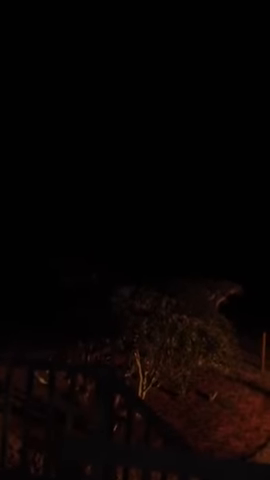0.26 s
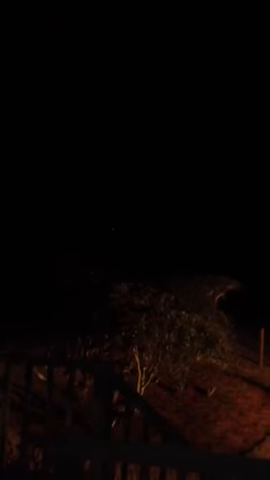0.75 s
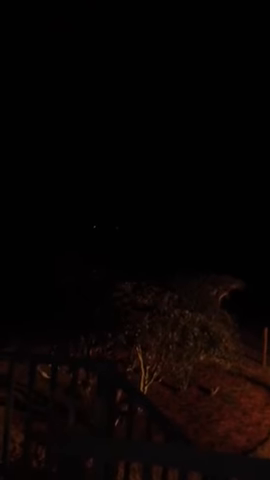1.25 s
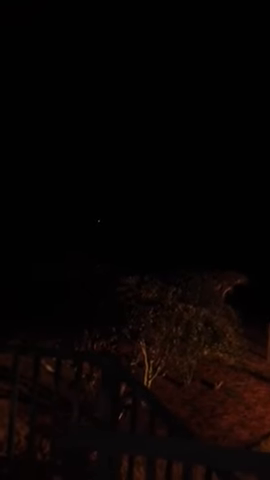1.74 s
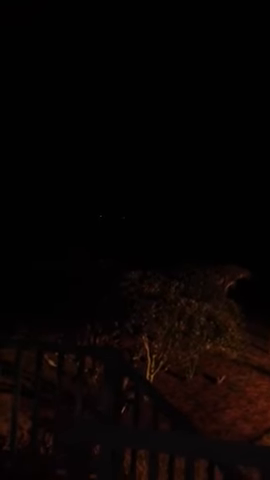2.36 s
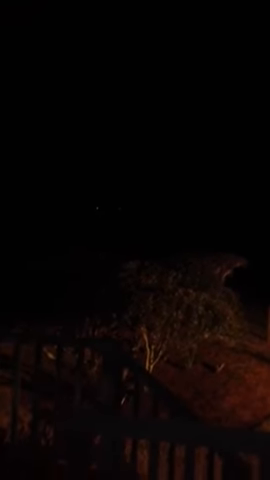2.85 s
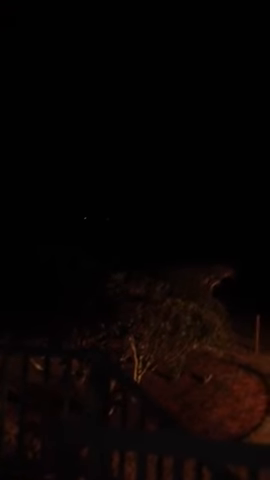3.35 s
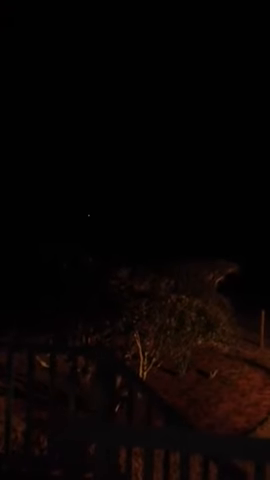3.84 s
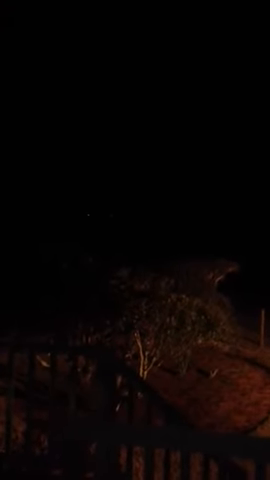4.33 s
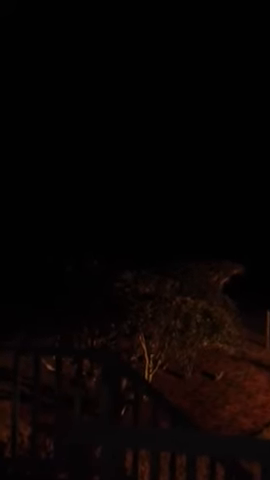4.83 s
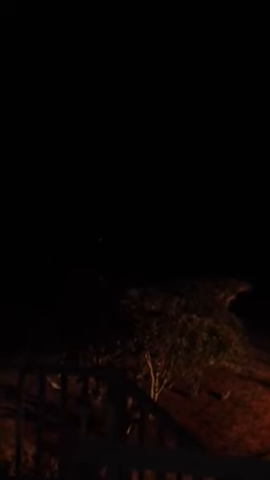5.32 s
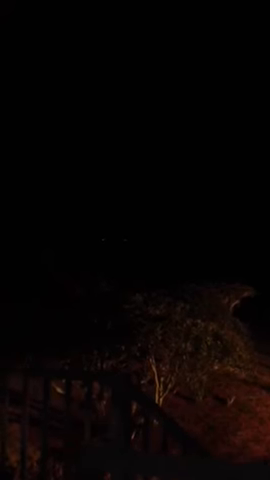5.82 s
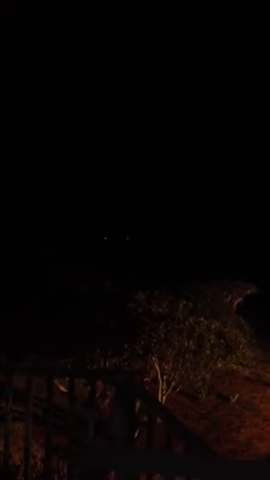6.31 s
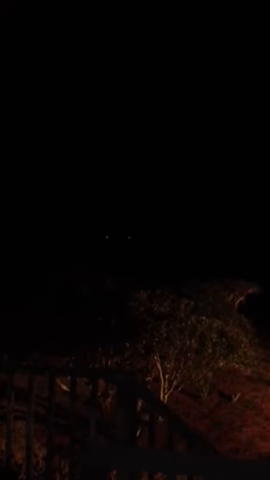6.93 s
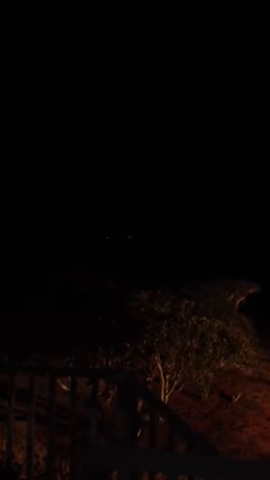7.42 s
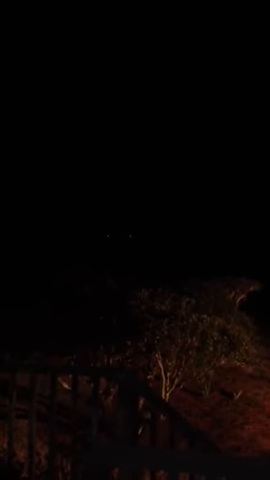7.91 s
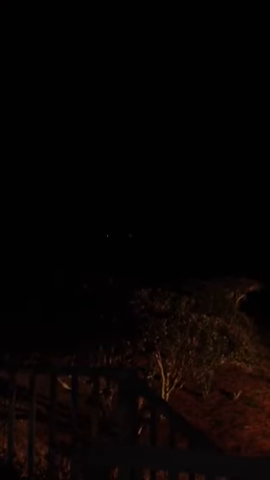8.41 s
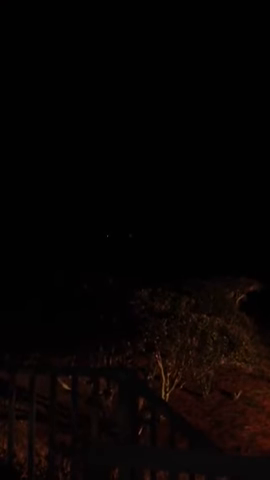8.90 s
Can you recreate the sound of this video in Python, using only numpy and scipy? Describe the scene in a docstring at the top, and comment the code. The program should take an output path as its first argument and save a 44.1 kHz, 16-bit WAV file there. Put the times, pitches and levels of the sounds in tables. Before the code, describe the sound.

Distant coyotes howl and yip together over open brushy ground in the dark. Wavering whistle-like howls come first, then denser, sharper yelps with raspy breaks, and finally scattered short calls. A small tick and a faint thin squeak occur early, close by. The microphone stays still and distant from the animals, picking up low rumble, soft hiss and a weak steady machine hum.

```python
"""Coyote pack at night

A pack yips and howls some way off across open ground; brush scatters the calls and slopes echo them.
Each call is a gliding, nearly pure voice of a few weak partials; where it breaks, it rasps and flutters.
Near the microphone a machine hums as wavering sine lines, with a faint thin squeak and a small tick.
Shaped noise makes the far rumble and the microphone's hiss."""
import sys
import numpy as np
from scipy import signal
from scipy.fft import rfft, irfft
from scipy.io import wavfile
from scipy.ndimage import uniform_filter1d

SR = 44100
rng = np.random.default_rng(int(sys.argv[2]) if len(sys.argv) > 2 else 0)


def unload_audio(sound):
    """Save the sound as a 16-bit wav file, at the path given as the first command line argument."""
    columns = np.transpose(np.atleast_2d(sound))
    # keep every value between -1 and 1, then stretch to whole-number steps
    steps = np.round(np.clip(columns, -1, 1) * 32767)
    wavfile.write(sys.argv[1], SR, steps.astype(np.int16))


N = 403956  # samples


def undb(db):
    """Amplitude factor of a level in dB."""
    return np.exp(np.asarray(db) * (np.log(10) / 20))


def unit(x):
    """Scale to an RMS of 1."""
    return x / np.sqrt(np.mean(x ** 2))


def walk(rate):
    """Random wander: levels held for 1 / rate seconds, smoothed twice, with an RMS of 1."""
    hold = int(SR / rate)
    held = np.repeat(rng.standard_normal(N // hold + 1), hold)[:N]
    return unit(uniform_filter1d(uniform_filter1d(held, hold), hold))


def band(x, hz, width):
    """Band-pass of two pole pairs, centred on hz."""
    edges = [hz - width / 2, hz + width / 2]
    return signal.sosfilt(signal.butter(2, edges, "band", fs=SR, output="sos"), x)


# Long wavering calls: (2nd partial [dB re fundamental], 3rd partial at 1 kHz [dB re fundamental], curve),
# each curve a list of (time [s], pitch [Hz], level of the fundamental [dB])
LONG_CALLS = [(-20, -26, [(0, 1067, -40.5), (.042, 1066, -48), (.125, 950, -41.5), (.16, 927, -53),
              (.185, 868, -46.5), (.277, 878, -42.5)]), (-9, -18, [(.07, 1165, -53), (.085, 1203, -47),
              (.142, 1375, -49), (.157, 1387, -39), (.185, 1396, -54), (.212, 1325, -48),
              (.255, 1100, -62)]), (-21, -25.5, [(.272, 1020, -52), (.29, 1010, -48), (.309, 982, -54),
              (.332, 1027, -38), (.387, 1048, -44), (.404, 1056, -38.5), (.459, 1320, -42.5),
              (.52, 1446, -54), (.579, 1434, -56.5), (.641, 1336, -44.5), (.688, 1305, -61)]),
              (-2, -12, [(.671, 991, -50), (.72, 1133, -49), (.745, 1203, -48), (.765, 1266, -52)]),
              (-17, -30, [(.755, 1290, -54), (.806, 1357, -45), (.855, 1312, -49.5), (.878, 1047, -57),
              (.9, 1000, -67)]), (-1, -25, [(.73, 959, -65), (.79, 701, -61), (.813, 635, -72),
              (.948, 527, -68)]), (-23, -29.5, [(1.18, 476.7, -69), (1.215, 624, -52.5),
              (1.257, 762, -35.5), (1.272, 889, -52), (1.305, 932, -41.5), (1.419, 898, -57.5)]),
              (-18, -35, [(1.449, 910, -49), (1.514, 1046, -40), (1.594, 1168, -56), (1.616, 1250, -37),
              (1.651, 1284, -51), (1.729, 1367, -62)]), (-9, -28, [(1.761, 581, -69), (1.818, 690, -54.5),
              (1.858, 815, -39), (1.876, 840, -53), (1.913, 914, -61), (2.0, 865, -54.5),
              (2.068, 733, -56)]), (-13.5, -35, [(2.285, 697, -56), (2.307, 872, -44), (2.345, 1021, -36),
              (2.355, 1102, -44), (2.362, 1436, -44), (2.385, 1485, -37), (2.469, 1525, -44),
              (2.492, 1467, -41.5), (2.517, 1436, -47.5), (2.547, 1016, -59)]),
              (-17, -31, [(2.548, 1000, -58), (2.556, 999, -47), (2.617, 1244, -57.5), (2.628, 1620, -55),
              (2.645, 1666, -51), (2.686, 1568, -46.5), (2.716, 1390, -69)]),
              (-9.5, -29.5, [(2.772, 589, -67), (2.79, 720, -55.5), (2.803, 853, -43), (2.819, 921, -50.5),
              (2.866, 932, -49.5), (2.886, 1020, -40), (2.908, 1160, -47)]), (-23, -30, [(2.841, 1090, -47),
              (2.893, 1220, -47), (2.902, 1360, -45), (2.956, 1484, -32.5), (3.04, 1475, -33),
              (3.085, 1462, -38), (3.12, 1461, -35), (3.145, 1454, -45), (3.168, 1134, -52)]),
              (-21, -32, [(3.14, 816, -55), (3.163, 880, -41), (3.183, 964, -52), (3.2, 1090, -41),
              (3.258, 1110, -41.5), (3.288, 1117, -76)]), (-13.5, -37, [(3.342, 621, -69),
              (3.362, 850, -43), (3.39, 1030, -35.5), (3.402, 1046, -44)]), (-13, -35, [(3.398, 1443, -45),
              (3.415, 1507, -33.5), (3.48, 1520, -38.5), (3.507, 1542, -37), (3.547, 1570, -43.5),
              (3.59, 1500, -43.5), (3.617, 1116, -53)]), (-18, -31, [(3.43, 715, -55), (3.495, 832, -45.5),
              (3.548, 1039, -36), (3.604, 1022, -39.5), (3.654, 747, -57), (3.754, 653, -51),
              (3.801, 727, -54), (3.829, 743, -43), (3.879, 981, -57), (3.961, 960, -44),
              (4.023, 1150, -40.5), (4.068, 1094, -37.5), (4.128, 758, -60)]),
              (-7.5, -31.5, [(3.729, 934, -51), (3.75, 1076, -47), (3.76, 1396, -47), (3.799, 1488, -34),
              (3.946, 1514, -47), (3.998, 1314, -56)]), (-15, -32.5, [(4.18, 579.5, -54), (4.205, 654, -53),
              (4.22, 663.4, -37.5), (4.232, 722, -36), (4.248, 890, -43.5), (4.272, 951, -41),
              (4.315, 942, -35.5), (4.338, 932, -51), (4.35, 917, -41), (4.407, 928, -60)]),
              (-8.5, -21, [(4.24, 664, -44), (4.288, 623, -55), (4.398, 602.6, -52), (4.437, 729, -45),
              (4.48, 832, -37), (4.552, 710, -46), (4.577, 714, -63), (4.595, 727, -44)]),
              (-11, -34.5, [(4.595, 723, -41.5), (4.654, 945, -43), (4.697, 881, -41), (4.802, 834.6, -53),
              (4.901, 745, -40), (4.999, 649, -58.5), (5.116, 597, -53), (5.163, 690, -44),
              (5.248, 973, -46), (5.308, 1020, -45.5)]), (-25, -20, [(4.52, 1048, -61.5),
              (4.535, 1043, -37), (4.595, 1022, -36), (4.62, 1056, -51), (4.66, 960, -60)]),
              (-15.5, -29.5, [(5.181, 669, -54), (5.37, 707, -52.5), (5.388, 731.5, -36.5),
              (5.408, 746, -40.5)]), (-15, -27, [(5.4, 1080, -66), (5.415, 1022, -37), (5.488, 1024, -39),
              (5.542, 960, -45), (5.565, 934, -58.5), (5.652, 785, -43.5), (5.692, 763.5, -34.5),
              (5.707, 740, -46)]), (-8, -28.5, [(6.61, 617.6, -62), (6.622, 618, -48), (6.75, 625, -49.5),
              (6.782, 685, -50), (6.822, 768, -45.5), (6.857, 806, -52)]), (-25, -25.5, [(6.849, 1036, -48),
              (6.899, 918, -49), (6.949, 979, -52), (7.029, 1019, -31.5), (7.066, 1002, -53)]),
              (-28, -38.5, [(7.009, 600, -42.5), (7.059, 887.3, -42.5), (7.106, 914, -50.5),
              (7.121, 864, -37.5), (7.201, 672.7, -48.5), (7.296, 711, -53.5), (7.418, 631, -58)]),
              (-18, -35, [(8.019, 752, -61), (8.052, 802, -34.5), (8.079, 882.7, -42.5),
              (8.102, 902, -37.5), (8.137, 952, -52)]), (0, -20, [(8.12, 925, -58), (8.15, 935, -52),
              (8.215, 933, -59), (8.25, 736, -65)]), (-17, -30, [(8.58, 916, -61.5), (8.62, 1039, -42),
              (8.655, 1140, -55), (8.713, 1000, -52), (8.748, 940, -60)])]
AIR_HZ = 3400  # the voices carry little above this


def pack():
    """All voices of the pack and the air of their rasps; distance dulls the treble."""
    t = np.arange(N) / SR
    low, high = rasp_curves(t)
    jitter, flutter = walk(130), walk(60)
    out = np.zeros(N)
    for second_db, third_db, rows in LONG_CALLS + yips():
        first = max(int((rows[0][0] - .02) * SR), 0)
        last = min(int((rows[-1][0] + 0.018) * SR), N)
        here = slice(first, last)
        own = (np.arange(first, last) + rng.integers(N)) % N  # each call shakes in its own way
        out[here] += call(t[here], second_db, third_db, rows, low[here], high[here],
                          jitter[own], flutter[own])
    out += breath(low, high)
    return signal.sosfilt(signal.butter(8, AIR_HZ, fs=SR, output="sos"), out)


# Short calls that swell and die: (start [s], loudest [s], end [s], start pitch [Hz], loudest pitch [Hz],
# end pitch [Hz], level of the fundamental at its loudest [dB], 2nd partial [dB re fundamental]);
# an end that comes too early is moved to SHORTEST_S after the loudest point
SHORT_CALLS = [(0, .042, 0.12, 1442, 1636, 1480, -48.5, 8),
               (0.27, 0.289, 0.35, 1598, 1592, 1500, -47.5, 1.5),
               (.04, .08, 0.1, 1560, 1520, 1440, -49, -8), (0.302, .345, 0.35, 1228, 1270, 1250, -60.5, 8),
               (.357, .41, 0.42, 1500, 1620, 1650, -57, 5),
               (5.05, 5.154, 5.25, 1050, 1233, 1346, -59.5, -18),
               (.87, 0.883, .95, 1750, 1720, 1640, -63, 0), (1.04, 1.095, 1.175, 777, 893, 904, -58.5, 1.5),
               (1.166, 1.253, 1.32, 1007, 1024, 1040, -42, -14),
               (1.245, 1.267, 1.3, 1335, 1353, 1360, -47, -6),
               (1.331, 1.399, 1.52, 1984, 1870, 1480, -60.5, -15),
               (1.42, 1.439, 1.47, 895, 842, 723, -43, -21),
               (1.637, 1.684, 1.77, 414, 418.6, 403, -55.5, -18),
               (1.821, 1.878, 1.97, 1218, 1344, 1225, -51.5, -5),
               (1.97, 1.996, 2.07, 1154, 1143, 1170, -45, -20),
               (2.205, 2.24, 2.17, 1000, 1128, 1180, -44.5, -23),
               (2.263, 2.284, 2.22, 1170, 1222, 1245, -47.5, -15.5),
               (3.164, 3.199, 3.09, 1520, 1649, 1660, -42.5, -22),
               (4.248, 4.258, 4.37, 1330, 1340, 1385, -44.5, -27),
               (4.4, 4.426, 4.42, 1083, 1057, 1070, -40.5, -25),
               (4.445, 4.48, 4.2, 1480, 1556, 1605, -41, -14),
               (4.633, 4.655, 4.67, 1470, 1480, 1490, -44, -17),
               (4.879, 4.936, 4.98, 1250, 1601, 1470, -38, -5.5),
               (4.855, 4.886, 4.91, 950, 1045, 1090, -54, -6),
               (4.909, 4.936, 4.92, 769, 806, 792, -42.5, 1.5),
               (4.965, 4.978, 5.03, 1020, 990, 730, -40.5, -21),
               (5.29, 5.384, 5.42, 1150, 1245, 1260, -45.5, -17),
               (5.385, 5.456, 5.47, 1550, 1527, 1500, -48, -12),
               (5.616, 5.656, 5.73, 800, 1000, 1020, -51, -2),
               (5.655, 5.689, 5.78, 1442, 1530, 1410, -40.5, -2.5),
               (5.73, 5.791, 5.75, 1500, 1586, 1560, -49.5, -3),
               (5.7, 5.795, 5.85, 986, 1076, 1060, -40, -15),
               (5.82, 5.864, 5.81, 1060, 1030, 1013, -33, -16),
               (5.9, 5.941, 6.04, 1420, 1495, 1520, -45, -5),
               (5.959, 5.998, 6.1, 1530, 1555, 1345, -40.5, -9),
               (6.084, 6.11, 6.12, 696, 819, 890, -40, -19),
               (6.147, 6.161, 6.18, 1790, 1764, 1720, -36.5, 1),
               (6.178, 6.187, 6.19, 982, 990, 854, -39.5, -16.5),
               (6.175, 6.19, 6.2, 1400, 1399, 1338, -49.5, -11),
               (6.243, 6.284, 6.2, 1360, 1417, 1460, -47, -13),
               (6.314, 6.324, 6.45, 1428, 1423, 1390, -45.5, -6),
               (6.375, 6.41, 6.44, 640, 792, 856, -39.5, -24),
               (6.43, 6.46, 6.54, 1330, 1348, 1340, -46, -10),
               (6.4, 6.45, 6.5, 1200, 1553, 1425, -40, -5.5), (6.475, 6.51, 6.52, 1010, 816, 675, -41, -29),
               (6.547, 6.606, 6.68, 1295, 1349, 1422, -45, -13.5),
               (6.55, 6.599, 6.62, 1130, 1130, 1158, -59.5, -15),
               (6.623, 6.66, 6.7, 1410, 1402, 1410, -47, -14),
               (6.692, 6.714, 6.73, 1000, 867, 810, -52, -20),
               (6.774, 6.831, 6.86, 1320, 1470, 1530, -43, -20),
               (7.027, 7.067, 7.1, 1303, 1360, 1350, -43.5, -25),
               (7.202, 7.228, 7.18, 690, 840, 900, -40.5, -28),
               (7.232, 7.249, 7.24, 1538, 1546, 1460, -43.5, 5.5),
               (7.262, 7.282, 7.34, 1480, 1528, 1490, -44.5, 6.5),
               (7.285, 7.304, 7.39, 1070, 1024, 950, -39, -34),
               (7.61, 7.73, 7.78, 1327, 1513, 1490, -50, -1.5), (7.63, 7.694, 7.9, 723, 731, 746, -60, -9),
               (7.77, 7.858, 7.915, 839, 873, 956, -43.5, -20),
               (7.891, 7.923, 7.97, 1580, 1650, 1490, -59, 17),
               (7.808, 7.845, 7.93, 640, 788.4, 1042, -43, -16),
               (7.832, 7.874, 7.8, 1373, 1438, 1509, -47.5, -29),
               (7.927, 7.955, 7.985, 1055, 1013, 1008, -49.5, -11),
               (7.94, 7.965, 8.01, 1670, 1500, 1286, -55, 1),
               (8.001, 8.037, 8.055, 1280, 1456, 1480, -54, -4),
               (8.03, 8.059, 8.15, 1510, 1633, 1627, -58.5, 18.5),
               (8.241, 8.27, 8.3, 690, 788, 819, -40.5, -24),
               (8.285, 8.327, 8.345, 825, 878, 885, -38, -21),
               (8.25, 8.335, 8.5, 1499, 1480, 1380, -55, -5), (8.3, 8.361, 8.36, 950, 1049, 1040, -45, -23),
               (8.32, 8.406, 8.4, 1035, 1045, 1000, -39, -19),
               (8.7, 8.728, 8.82, 1196, 1236, 1260, -44.5, -21),
               (8.755, 8.781, 8.83, 885, 863, 780, -58, -13.5),
               (8.93, 8.976, 8.9, 850, 922, 959.7, -63.5, 0),
               (9.082, 9.143, 9.3, 1037, 1048, 1051, -56, -18.5)]
ONSET_DB, FADE_DB, SWELL_CURVE = -15.5, -16, 2  # ends re loudest point, and the bend between
GLIDE_CURVE = 1.392  # above 1 the glide slows near the loudest point
THIRD_DB = -13  # 3rd partial at 1 kHz re the 2nd
SHORTEST_S = .018  # quickest dying away


def yips():
    """The short calls, laid out like the long ones."""
    return [yip(*row) for row in SHORT_CALLS]


def yip(start_s, top_s, end_s, start_hz, top_hz, end_hz, db, second_db):
    """A short call glides and swells to its loudest point, then glides on and fades."""
    end_s = max(end_s, top_s + SHORTEST_S)
    away = np.arange(8, -1, -1) / 8  # 0 at the loudest point, 1 at the ends
    rise = [top_s - (top_s - start_s) * away,
            top_hz + (start_hz - top_hz) * away ** GLIDE_CURVE,
            db + ONSET_DB * away ** SWELL_CURVE]
    away = away[-2::-1]
    fall = [top_s + (end_s - top_s) * away,
            top_hz + (end_hz - top_hz) * away ** GLIDE_CURVE,
            db + FADE_DB * away ** SWELL_CURVE]
    return second_db, second_db + THIRD_DB, np.hstack([rise, fall]).T


JITTER, HOARSE_JITTER = .005, .036  # pitch spread as a share: clear, and added when fully hoarse
FLUTTER_DB, HOARSE_FLUTTER_DB = 2.2, 2  # before the weight of each partial: clear, and added when hoarse
FLUTTER_BASE, FLUTTER_RISE = .5, .8  # weight on the fundamental, and added for each higher partial
HEAD_HZ, HEAD_DB = 1337, -22.5  # the voice thins above this pitch: change of the 2nd partial
HEAD_HALF_DB = -13.5  # partial at 1.5 times the pitch, re fundamental, when a high voice turns hoarse
THIRD_DB_PER_OCTAVE = -19.5  # fall of the 3rd partial with pitch
FOURTH_TOP_HZ = 2930  # the 4th partial fades above this
OVERTONE_HOLD = 0.16  # share of the fundamental's dips that the overtones do not follow
SCOOP_DB, SCOOP_S = 18.5, 0.025  # overtone boost of a fast upward scoop, and its decay time
SCOOP_OCTAVES_PER_S = 14.6  # climb that earns the full boost
WHOLE_DB, HALF_DB = -5.5, -4  # a rasp's whole and half partials


def call(t, second_db, third_db, rows, low, high, jitter, flutter):
    """One voice: partials of a gliding pitch; in a rasp it jitters, brightens and doubles its period."""
    s, hz, db = np.transpose(rows)
    level_db = np.interp(t, s, db)
    glide = np.interp(t, s, hz)
    size = undb(level_db)
    fade = np.clip(np.minimum(t - s[0], s[-1] - t) / 0.0025 + 1, 0, 1)
    hoarse = low / (low + undb(-54.5))  # 0 clear, towards 1 in a strong rasp
    pitch = uniform_filter1d(glide, size=SR // 140)
    pitch = pitch * (1 + (JITTER + HOARSE_JITTER * hoarse) * jitter)
    phase = 2 * np.pi * np.cumsum(pitch) / SR

    # overtones hold up in the dips and start rich in a fast scoop
    overtone_db = OVERTONE_HOLD * (db.max() - level_db)
    octaves = np.log2(uniform_filter1d(glide, size=SR // 100))
    climb = np.gradient(octaves) * SR / SCOOP_OCTAVES_PER_S
    overtone_db = overtone_db + SCOOP_DB * np.clip(climb, 0, 1) * np.exp(-np.maximum(t - s[0], 0) / SCOOP_S)
    head = 1 / (1 + (HEAD_HZ / pitch) ** 12)  # 0 in the chest register, 1 in the head register
    second_db = second_db + overtone_db + HEAD_DB * head
    third_db = third_db + overtone_db + THIRD_DB_PER_OCTAVE * np.log2(pitch / 1000)
    fourth_db = third_db - 11.5 - 14 / (1 + (FOURTH_TOP_HZ / (4 * pitch)) ** 12)

    # the folds close unevenly, which shakes each partial, the upper ones most
    shake_db = FLUTTER_DB + HOARSE_FLUTTER_DB * hoarse
    tone = 0
    for k, partial_db in enumerate([0, second_db, third_db, fourth_db]):
        weight = FLUTTER_BASE + FLUTTER_RISE * k
        shaken_db = partial_db + shake_db * weight * np.roll(flutter, 300 * k)
        tone = tone + undb(shaken_db) * np.sin((k + 1) * phase)
    half_gain = undb(HEAD_HALF_DB + 4.9 * np.roll(jitter, 700))
    tone = tone + head * hoarse * half_gain * np.sin(3 * phase / 2)

    # only the chest register breaks; strong and weak cycles alternate and fill in the half partials
    rasp = 0
    if pitch.min() < HEAD_HZ and low.any():
        for k in range(3, 11):  # counted in half partials
            partial_db = HALF_DB if k % 2 else WHOLE_DB
            gain = throat_gain(k / 2 * pitch, low, high) * undb(partial_db + 5.0 * np.roll(jitter, 400 * k))
            rasp = rasp + gain * np.sin(k / 2 * phase)
    breaks = size / (size + undb(-39.5)) / (1 + (pitch / 1250) ** 8)
    return np.sqrt(2) * fade * (size * tone + breaks * rasp)


# Hoarse breaks in the voices: (centre [s], width at half height [s], strength [dB], treble tilt [dB])
HOARSE_BREAKS = [(0.03, 0.12, -53, -8), (0.309, 0.07, -56, -9), (0.433, 0.12, -61, 1),
                 (0.726, .06, -63, -2), (1.262, 0.043, -55.5, -6.5), (2.333, 0.073, -58, -8),
                 (2.807, 0.03, -58, -4), (3.184, 0.036, -58.5, -10), (3.393, 0.029, -46.5, -3),
                 (3.62, 0.032, -60, -16), (4.065, 0.16, -59, -5), (4.27, 0.066, -56.5, -14),
                 (4.469, 0.08, -51, -11.5), (4.521, 0.02, -57, -7), (4.66, 0.06, -55, -14),
                 (4.973, 0.16, -61.5, -2), (5.454, 0.16, -60, -3.5), (5.645, 0.027, -52, -15),
                 (5.746, 0.072, -51.5, -7), (6.135, 0.08, -51.5, -8.5), (6.416, 0.043, -57, -22),
                 (6.479, 0.069, -54, -5.5), (6.858, 0.097, -52.5, -3.5), (7.084, 0.057, -56, -6),
                 (7.283, 0.1, -54.5, -15), (7.571, 0.13, -61.5, -12), (7.901, 0.076, -55, -6.5),
                 (8.1, 0.15, -58.5, -6), (8.349, 0.12, -54.5, -4), (8.66, .12, -64, -10)]


def rasp_curves(t):
    """Bell-shaped strength of the hoarse breaks, for the low and the high throat resonances."""
    low, high = np.zeros(N), np.zeros(N)
    for s, length, db, tilt_db in HOARSE_BREAKS:
        near = slice(max(int((s - 2 * length) * SR), 0), int((s + 2 * length) * SR))
        shape = np.exp(-.5 * ((t[near] - s) / (0.43 * length)) ** 2)
        low[near] += undb(db) * shape
        high[near] += undb(db + tilt_db) * shape
    return low, high


# Throat resonances: (centre [Hz], width [Hz], gain [dB]); the last two follow the treble tilt
THROAT_RESONANCES = [(912, 195, 7.5), (1500, 470, 10.5), (2185, 700, 11), (3340, 470, -2.5)]
BREATH_DB = -10.5  # turbulent air, before each resonance's gain


def throat_gain(hz, low, high):
    """Gain of the throat resonances at a moving frequency, scaled by the strength of the rasp."""
    gain = 0
    for k, (centre, width, db) in enumerate(THROAT_RESONANCES):
        strength = low if k < 2 else high
        gain = gain + undb(db) * strength / np.hypot(1, np.square(2 * (hz - centre) / width))
    return gain


def breath(low, high):
    """Turbulent air of the rasps: noise escapes in uneven puffs and rings the throat resonances."""
    out = np.zeros(N)
    for k, (hz, width, db) in enumerate(THROAT_RESONANCES):
        strength = low if k < 2 else high
        puffs = undb(4.3 * walk(140)) * rng.standard_normal(N)
        out += undb(db + BREATH_DB) * strength * unit(band(puffs, hz, width))
    return out


# Near scatter, then far slopes: (start after the direct sound [s], 60 dB decay time [s], level [dB])
ECHO_TAILS = [(.003, .14, -6.5), (.04, .7, -15.5)]


def echoes(x):
    """Ground and brush scatter the sound at once, which smears fast glides; slopes return it later."""
    t = np.arange(SR) / SR
    response = 0
    for start_s, t60_s, db in ECHO_TAILS:
        tail = rng.standard_normal(SR) * np.exp(-np.log(1000) * t / t60_s) * (t > start_s)
        response = response + undb(db) * tail / np.sqrt(np.sum(tail ** 2))
    return signal.fftconvolve(x, response)[:N]


# Lines of the faint thin squeak: (frequency [Hz], level [dB])
SQUEAK_LINES = [(2300, -73), (4290, -77.5), (6422, -83)]
# When it sounds: (start [s], end [s])
SQUEAK_SPAN = (0.926, 1.22)


def squeak():
    """A faint squeak of steady sine lines that swells in and out."""
    t = np.arange(N) / SR
    start_s, end_s = SQUEAK_SPAN
    swell = np.clip(np.minimum(t - start_s, end_s - t) / .06, 0, 1)
    return swell * sum(np.sqrt(2) * undb(db) * np.sin(2 * np.pi * hz * t) for hz, db in SQUEAK_LINES)


TICK_S, TICK_DB = 0.379, -53  # onset; level of the noise at its onset, before the band-pass


def tick():
    """A small tick near the microphone: a decaying burst of band-passed noise."""
    t = np.arange(N) / SR
    burst = rng.standard_normal(N) * np.exp(-np.abs(t - TICK_S) / 0.013) * (t > TICK_S)
    return undb(TICK_DB) * band(burst, 4700, 4500)


# Lines of the machine near the microphone: (frequency [Hz], level [dB])
HUM_LINES = [(98, -75), (119, -79.5), (170, -73.5), (295, -63)]


def machine_hum():
    """Sine lines that waver slightly in pitch and level."""
    out = np.zeros(N)
    for hz, db in HUM_LINES:
        phase = 2 * np.pi * np.cumsum(hz + 0.893 * walk(6)) / SR
        out += np.sqrt(2) * undb(db + 0.36 * walk(4.5)) * np.sin(phase)
    return out


# Spectrum of the far rumble and the microphone's hiss, and its overall level:
# (frequency [Hz], relative density [dB per Hz])
NIGHT_SPECTRUM = [(15, -58), (25, -15.5), (81, -8), (238, -7), (295, -5), (417, -11), (884, -14),
                  (1400, -15.5), (2960, -28), (15200, -32.5)]
NIGHT_DB = -59


def night():
    """Steady rumble and hiss: white noise shaped along the spectrum."""
    hz, db = np.transpose(NIGHT_SPECTRUM)
    f = np.maximum(np.arange(N // 2 + 1) * SR / N, 1)
    gain = undb(np.interp(np.log(f), np.log(hz), db))
    noise = irfft(rfft(rng.standard_normal(N)) * gain, N)
    return undb(NIGHT_DB) * unit(noise)


def scene():
    """The pack with its echoes, over the sounds near the microphone and the night."""
    voices = pack()
    return (voices + echoes(voices) + squeak() + tick() + machine_hum() + night())[None]


TOP_HZ = 15320  # the recorder's upper limit


def record(dry):
    """The microphone drops the deepest bass; the recorder cuts the top."""
    dry = signal.sosfilt(signal.butter(2, 38, "high", fs=SR, output="sos"), dry)
    return signal.sosfilt(signal.ellip(10, .2, 60, TOP_HZ, fs=SR, output="sos"), dry)


dry = scene()
out = record(dry)
unload_audio(out)
```